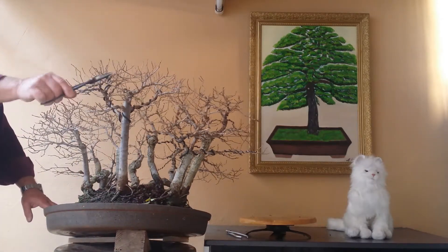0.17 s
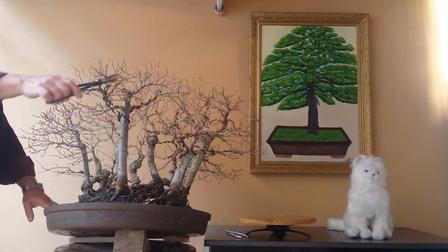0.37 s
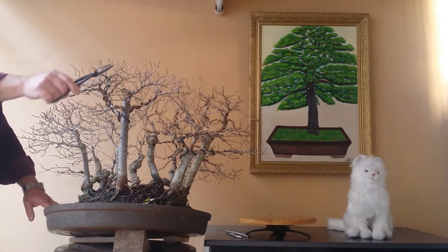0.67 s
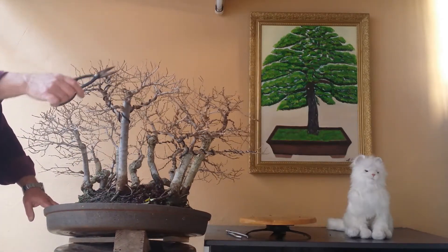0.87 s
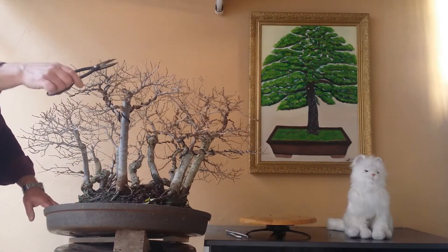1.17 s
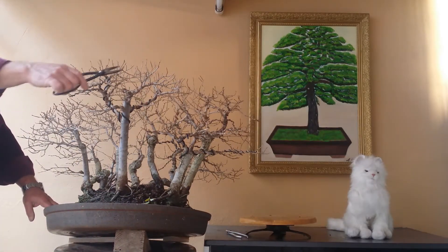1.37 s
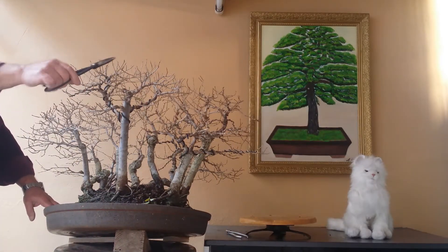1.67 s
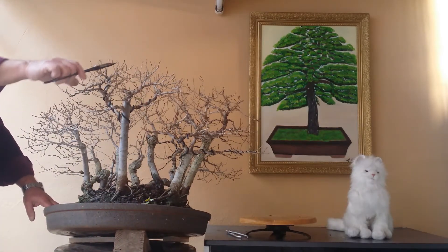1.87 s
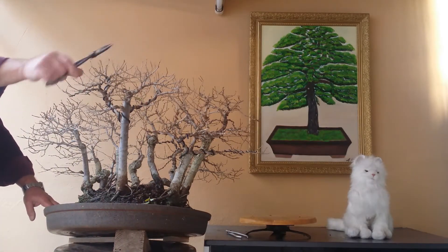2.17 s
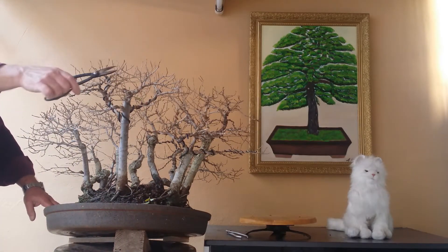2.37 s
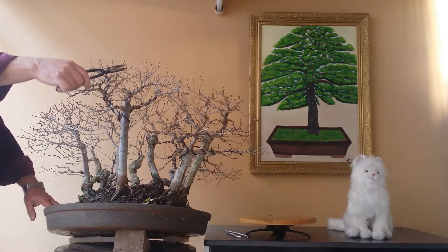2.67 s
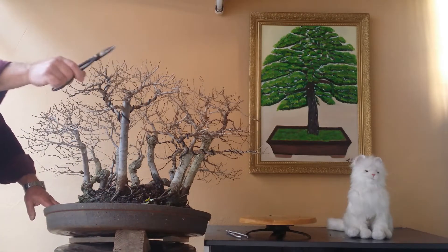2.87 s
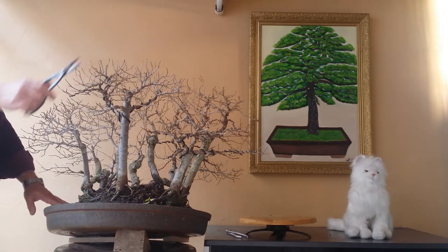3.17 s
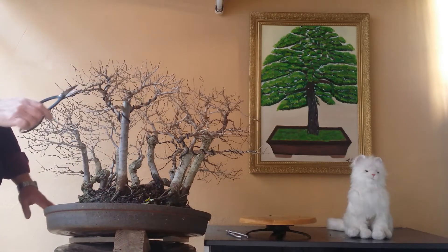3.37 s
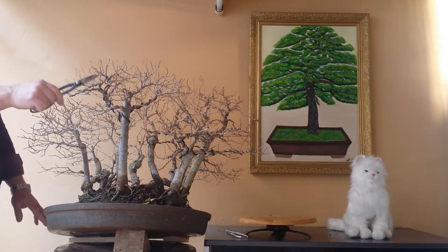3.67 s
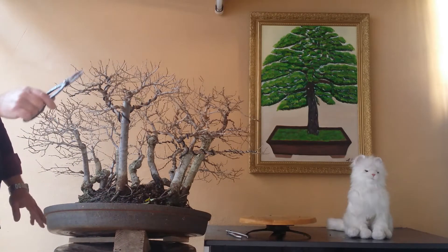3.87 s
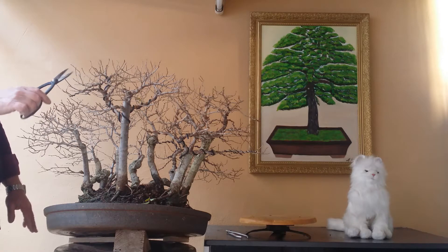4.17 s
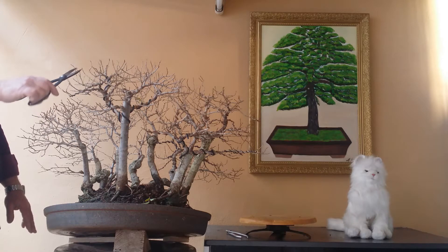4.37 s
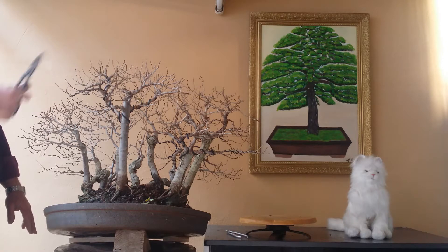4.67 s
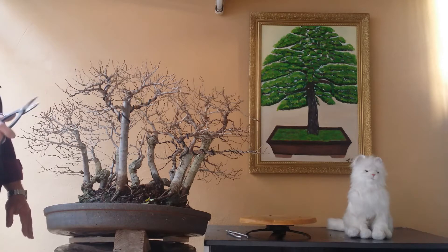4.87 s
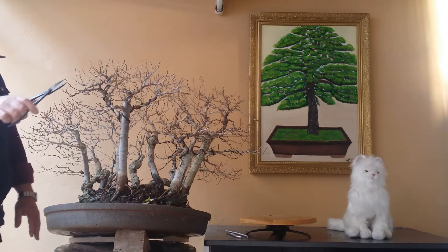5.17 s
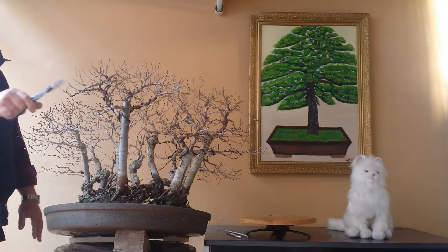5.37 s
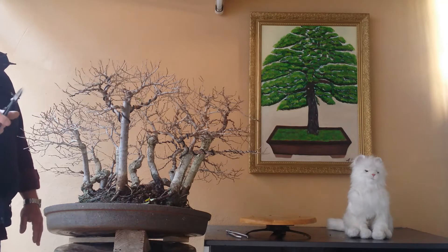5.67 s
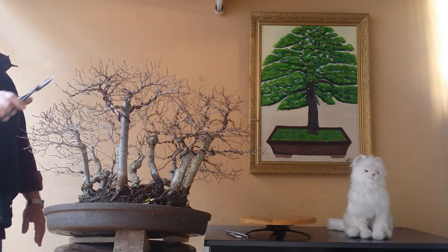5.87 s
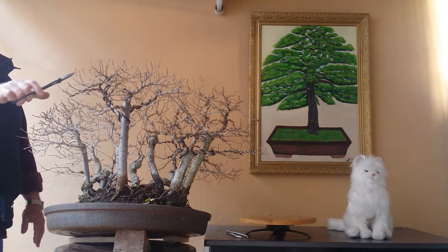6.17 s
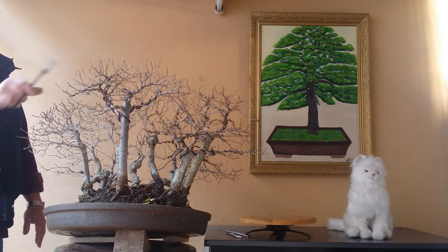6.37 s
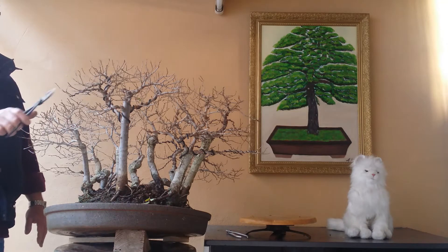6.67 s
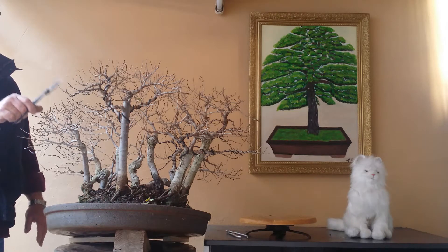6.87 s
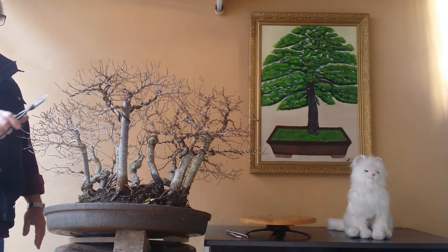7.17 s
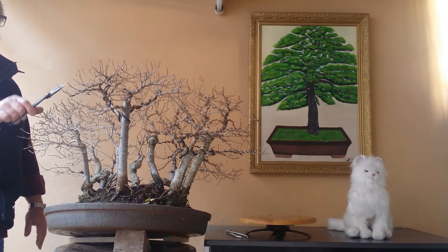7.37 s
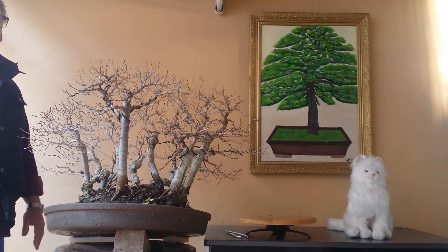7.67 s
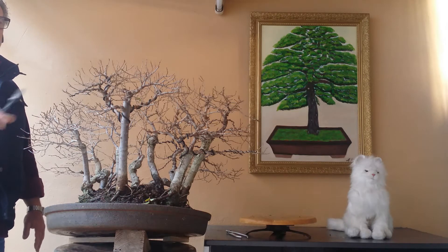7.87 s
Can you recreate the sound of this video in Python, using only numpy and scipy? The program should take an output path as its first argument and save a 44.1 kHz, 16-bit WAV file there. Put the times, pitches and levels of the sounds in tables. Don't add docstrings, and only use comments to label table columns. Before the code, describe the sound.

A close stereo pickup in a small bare room, with soft steady hiss and low traffic rumble through the walls. Slightly left, small steel shears snip dry twigs: very short bright cracks with brief hard reflections and a trembling rustle. Cuts come at about 0.03, 0.5, 1.0 (barely audible), 1.5, 2.0, 2.7, 3.7, 4.5, 5.3, 6.3, 6.8, 7.4 and 7.9 seconds; those at 0.5, 2.0, 2.7, 5.3 and 7.4 are strongest. Faint blade touches precede some, and a tiny cutting taps the table near 5.0. Outside, an engine's low hum climbs until about 2.8, then drops off after 3.15, with a dull wheel bump. Traffic is quieter around 3.5 to 5, then a heavy vehicle draws near, its deep drone and tyre roar swelling from 6.5 and loudest from 7.1 to the end. Thumps come near 7.2 and 7.85, with a faint high brake whistle around 7.7.

```python
import sys
import numpy as np
from scipy import signal
from scipy.fft import rfft, irfft, next_fast_len
from scipy.io import wavfile
from scipy.ndimage import uniform_filter1d, map_coordinates

SR = 44100
rng = np.random.default_rng(int(sys.argv[2]) if len(sys.argv) > 2 else 0)


def bounce(signal):
    frames = np.transpose(np.atleast_2d(signal))
    limited = np.clip(frames, -1, 1)
    pcm = np.round(limited * 32767).astype(np.int16)
    wavfile.write(sys.argv[1], SR, pcm)


def natural_amplitude(level_db):
    exponent = np.asarray(level_db, float) / 20
    return 10 ** exponent


N = 353990

# frequency in Hz, level in dB per Hz.
HISS_COLOUR = [(710, -41), (1200, -7.5), (1900, -8.5), (3000, -5), (4000, -6), (5500, -24), (6100, 3.5),
               (6900, -2), (7300, -1.5), (7900, 1), (8800, -6.5), (10500, -3.5), (11500, -15),
               (15500, -5.5)]
# frequency in Hz, level in dB per Hz.
SWAY_COLOUR = [(6, -3), (18, -2), (27, 0), (34, -3), (44, -20), (70, -60)]
# frequency in Hz, left-right likeness from -1 to 1.
LIKENESS = [(60, 0.89), (110, 0.9), (200, 0.87), (380, 0.82), (700, 0.29), (1290, -0.3), (2380, 0.089),
            (4400, -0.1), (8120, 0.012), (15000, -0.064)]
# time in seconds, firing rate in Hz, load in dB.
NEAR_ENGINE = [
    (0, 79.56, -58),
    (.5, 85.9, -59.5),
    (1.25, 90.56, -56.5),
    (1.42, 92.2, -51.5),
    (1.62, 95.2, -49.5),
    (1.78, 96, -62),
    (2.08, 96.1, -52),
    (2.8, 98.35, -51),
    (3.15, 96.5, -50.5),
]
# centre in seconds, rate in Hz, half length in seconds, level in dB.
IDLE_THROBS = [
    (0.19, 56.3, .15, -72),
    (0.846, 62, 0.25, -68),
    (1.251, 54, 0.12, -69),
    (2.2, 54.7, 0.12, -58.5),
    (2.64, 53.6, 0.081, -57),
    (3.05, 53.7, 0.11, -56),
    (3.282, 51.56, 0.075, -65),
    (3.75, 55.9, 0.067, -59.5),
]
# time in seconds, firing rate in Hz, level in dB.
HEAVY_ENGINE = [
    (3.4, 56, -75),
    (4.1, 56.26, -67),
    (5.0, 56.57, -73.5),
    (5.35, 57.05, -62),
    (6.9, 55.17, -57.5),
    (7.05, 54.7, -47),
    (7.4, 54.64, -46),
    (7.6, 53.4, -50),
    (8.03, 49.8, -50.5),
]
# multiple of the firing rate, level in dB, extra growth in dB per dB of level.
HEAVY_PARTIALS = [(1, 0, -0.19), (2, -4.5, -0.14), (2.42, -7, 0.27), (1.8, -14, 0.49)]
# centre in Hz, width in Hz, lift in dB.
ROOM_MODES = [(96.4, 7.8, 14.5), (176.4, 6.7, 16), (163, 4, 8)]
# time in seconds, nearness in dB.
NEARNESS = [(0, -67.5), (1.45, -66), (1.54, -63), (1.92, -67), (2.12, -62.5), (2.5, -64.5), (3.04, -64),
            (3.46, -70), (4.11, -69.5), (5.3, -65.5), (5.5, -63.5), (5.9, -62), (6.5, -58.5), (6.84, -56),
            (7.07, -48.5), (7.3, -46), (7.5, -45.5), (8.03, -45.5)]
# frequency in Hz, level in dB per Hz.
BOOM_COLOUR = [(12, 5.5), (28, -28), (40, -26), (54, 7), (75, -1.5), (98, 1), (115, -2.5), (135, 0.5),
               (157, -5.5), (178, -2), (210, -8), (250, -6.5), (300, -6.5), (420, -50)]
# frequency in Hz, level in dB per Hz.
RUMBLE_COLOUR = [(120, -9.5), (200, -2), (253, -1), (292, -5.5), (325, -1), (394, -4), (448, -2.5),
                 (502, -4), (579, -5), (839, -6), (995, -9.5), (1100, -10.5), (1430, -19.5), (2420, -120)]
# frequency in Hz, level in dB per Hz.
ROAR_COLOUR = [(470, -25), (800, -11.5), (1200, -8.5), (1800, -11), (2600, -17.5), (3800, -28), (5500, -36),
               (9000, -63)]
# frequency in Hz, level in dB per Hz.
RUSTLE_COLOUR = [(1500, -11.5), (3000, -4.5), (6500, 0), (10000, -5), (15500, -14.5)]
# time in seconds, strength in dB, brightness in dB per octave, twig body in dB,
# room answer in dB.
SNIP_EVENTS = [(0.0333, -23.5, 0, 3.5, -0.5), (0.5144, -15.5, 0.5, 5.5, -1), (1.0254, -46, -2.5, 7, 0.5),
               (1.487, -25, -1, 0.5, 0.5), (2.0125, -12.5, 0, -0.5, -1.5), (2.718, -15, -1, -1, 1),
               (3.6687, -26, 1, 6.5, 0), (4.4804, -27.5, -1.5, -2, -0.5), (5.3339, -12, 0.5, 5, -1),
               (6.2552, -24.5, 0, 5.5, 1.5), (6.8434, -27, -4, -0.5, 0), (7.4037, -12.5, 0.5, 0, 1),
               (7.867, -30, -4, -15, 2.5)]
# three ringing modes in Hz, one damped mode in Hz.
GRIP_MODES = [(5100, 6950, 20000, 3300), (5960, 5720, 7300, 1900), (4170, 4100, 9200, 12800),
              (4800, 11200, 13600, 3200), (3283, 6550, 8450, 8700), (6750, 11630, 14900, 7400),
              (3720, 8100, 11900, 4400), (2150, 7550, 24000, 15000), (2120, 11000, 14000, 1970),
              (7330, 11250, 12900, 9500), (6370, 8200, 12000, 3300), (4600, 12000, 16100, 8500),
              (5370, 5800, 11100, 9100)]
# time in seconds, strength in dB, brightness in dB per octave,
# twig body in dB, room answer in dB.
BRUSH_EVENTS = [
    (2.003, -42, -6, 2, 3),
    (2.637, -55, -1, 0, 1),
    (2.703, -46, -2, -7, -1),
    (5.304, -45, -6.5, 0, 7),
    (5.312, -55, 0, 6, 2),
    (5.792, -57, -1, -1, 1),
]
# three ringing modes in Hz, one damped mode in Hz.
OPEN_BLADES = (5370, 6330, 13000, 9000)
# time in seconds, strength in dB, brightness in dB per octave,
# twig body in dB, room answer in dB.
BOUNCES = [
    (5.015, -58, -8, 6, 8),
    (5.027, -51, -8.5, 6, 6.5),
    (5.035, -51, -17, 8, 0),
]
# three ringing modes in Hz, one damped mode in Hz.
TABLE_MODES = (600, 820, 1650, 2150)
# frequency in Hz, level in dB per Hz.
CRACK_COLOUR = [(400, -35), (1000, -25.5), (1600, -15), (2100, -10), (2450, -12.5), (2900, -9),
                (4600, -3.5), (5600, -4), (6700, 1), (7600, 1), (8800, -2), (11500, -1.5), (15200, 4.5),
                (16900, -29)]
# frequency in Hz, time to fall 60 dB in seconds.
ROOM_DECAY = [(1000, 0.26), (2600, 0.31), (7000, 0.25), (12000, 0.23), (16000, 0.15)]
# delay in seconds, level in dB, left-right tilt in dB.
FIRST_ECHOES = [(.0018, -19, 7), (.0031, -15.5, -23), (.0037, -39, 15), (.0055, -27, 3), (.008, -20, -29),
                (.010, -23, -6), (0.014, -11.5, 11)]
# time in seconds, half length in seconds, level in
# dB.
THUMPS = [
    (3.126, 0.075, -51.5),
    (3.772, 0.064, -54),
    (4.757, 0.031, -62.5),
    (6, 0.068, -61),
    (4.53, 0.038, -59.5),
    (1.5, 0.082, -60),
    (0.62, .02, -67),
    (7.2, 0.23, -53.5),
    (7.85, 0.071, -46.5),
]
# frequency in Hz, level in dB per Hz.
THUD_COLOUR = [(40, -11), (90, 1), (200, -6.5), (330, -18), (600, -17), (1400, -22.5), (3000, -31.5),
               (8000, -30), (15000, -57)]
# start in seconds, end in seconds, first pitch in Hz, last pitch in Hz, level in dB.
BRAKE_SQUEALS = [
    (7.63, 7.83, 4880, 5150, -64),
    (7.64, 7.76, 4320, 4330, -69),
]

TOP_HZ = 15650
LEAD = 7.36
MIDDLE_DB = -60


def unit(x):
    return x / np.sqrt(np.mean(x ** 2) + 1e-20)


def along(points, hz):
    f, v = np.transpose(points)
    return np.interp(np.log(hz + 1), np.log(f + 1), v)


def curves(rows):
    s, *columns = np.transpose(rows)
    return [np.interp(np.arange(N) / SR, s, column) for column in columns]


def wobble(rate):
    knots = rng.standard_normal(int(N * 40 / SR) + 4)
    return map_coordinates(knots, [np.arange(N) * min(rate, 39) / SR])


def swell(s, half):
    t = np.arange(N) / SR
    return np.exp(-.5 * ((t - s) / half) ** 2)


def causal(db):
    cep = irfft(np.log(natural_amplitude(db) + 1e-6))
    half = len(cep) // 2
    cep[1:half] *= 2
    cep[half + 1:] = 0
    return np.exp(rfft(cep))


def rush(spectrum, patchy_db):
    z = signal.stft(rng.standard_normal((2, N)), nperseg=512)[2]
    field = uniform_filter1d(rng.standard_normal(z.shape[1:]), size=6, axis=0)
    field = uniform_filter1d(field, size=14, axis=1)
    pair = signal.istft(z * natural_amplitude(patchy_db * unit(field)), nperseg=512)[1][:, :N]
    m = next_fast_len(N + 8192)
    hz = np.fft.rfftfreq(m, 1 / SR)
    turn = np.arccos(np.clip(along(LIKENESS, hz), -1, 1)) / 2
    colour = natural_amplitude(along(spectrum, hz)) * (hz < TOP_HZ)
    mid, side = irfft(rfft(pair, m) * colour * [np.cos(turn), np.sin(turn)], m)[:, :N]
    return unit(np.array([mid + side, mid - side]))


def microphone_hiss():
    return natural_amplitude(-70.5) * rush(HISS_COLOUR, patchy_db=0.6)


def building_sway():
    return natural_amplitude(-71.5) * rush(SWAY_COLOUR, patchy_db=0.7)


def throttle():
    hz, load_db = curves(NEAR_ENGINE)
    coasting = np.clip(np.arange(N) / SR - NEAR_ENGINE[-1][0], 0, 2)
    return hz - 31.5 * np.minimum(coasting, 1), load_db - 58 * coasting


def room_lift(hz):
    return sum(db / (1 + ((hz - c) / w) ** 2) for c, w, db in ROOM_MODES) - ROOM_MODES[0][2]


def near_engine():
    hz, load_db = throttle()
    phase = 2 * np.pi * np.cumsum(hz * (1 + 0.0046 * wobble(9.5))) / SR
    first = natural_amplitude(load_db + room_lift(hz) + 0.42 * wobble(7.54)) * np.sin(phase)
    second = natural_amplitude(load_db - 6 + room_lift(2 * hz) + 1.7 * wobble(7.0)) * np.sin(2 * phase)
    return first + second


def idling_engine():
    t = np.arange(N) / SR
    return sum(natural_amplitude(db) * swell(s, half) * np.sin(2 * np.pi * hz * t) for s, hz, half, db in IDLE_THROBS)


def heavy_engine():
    hz, db = curves(HEAVY_ENGINE)
    out = np.zeros(N)
    for multiple, order_db, grows in HEAVY_PARTIALS:
        turns = np.cumsum(multiple * hz * (1 + 0.013 * wobble(12))) / SR
        level_db = db + order_db + grows * (db - MIDDLE_DB)
        unsteady_db = (.5 + 1.16 * multiple) * wobble(9)
        out += natural_amplitude(level_db + unsteady_db) * np.sin(2 * np.pi * turns)
    return out * (np.arange(N) / SR > 3.4)


def engines():
    return np.sqrt(2) * (near_engine() + idling_engine() + heavy_engine()) * natural_amplitude([[-.3], [.3]])


def shaking():
    events = np.array(SNIP_EVENTS)
    since = np.clip(np.arange(N) / SR - events[:, :1], 0, None)
    rise_s, fall_s = 0.037, 0.12
    return natural_amplitude(events[:, 1] / 2) @ ((1 - np.exp(-since / rise_s)) * np.exp(-since / fall_s))


def road():
    near_db, = curves(NEARNESS)

    def law(level_db, growth):
        return natural_amplitude(level_db + growth * (near_db - MIDDLE_DB))

    surge = wobble(6.5)
    tremble = natural_amplitude(-49) * shaking()
    rocking_pot = natural_amplitude(1.5) * tremble
    intake = natural_amplitude(throttle()[1] - 23)
    boom = law(-58.5, 0.8) * natural_amplitude(0.43 * surge) * rush(BOOM_COLOUR, patchy_db=2.5)
    rumble_level = np.hypot(law(-57.5, 1.01) * natural_amplitude(0.5 * surge), rocking_pot)
    rumble = rumble_level * rush(RUMBLE_COLOUR, patchy_db=1.0)
    roar = law(-64, 0.9) * natural_amplitude(1.8 * surge) * rush(ROAR_COLOUR, patchy_db=1.3)
    rustle_level = np.hypot(law(-66.5, 0.59) + intake, tremble)
    rustle = rustle_level * rush(RUSTLE_COLOUR, patchy_db=2.5)
    return (boom + rumble + roar) * natural_amplitude([[-.9], [.9]]) + rustle


def room():
    hz, t, z = signal.stft(rng.standard_normal((2, SR // 2)), SR, nperseg=256)
    decay = natural_amplitude(-60 * t / along(ROOM_DECAY, hz)[:, None])
    tail = signal.istft(z * decay, SR, nperseg=256)[1][:, :SR // 2]
    t = np.arange(tail.shape[1]) / SR
    sparse = natural_amplitude(4.1 * np.exp(-t / .02) * rng.standard_normal(tail.shape))
    tail = tail * sparse * (1 - np.exp(-(t / 0.0032) ** 2))
    answer = natural_amplitude(7.5) * tail / np.linalg.norm(tail, axis=1, keepdims=True)
    for s, db, pan_db in FIRST_ECHOES:
        at = np.round((s + rng.normal(0, 0.00022)) * SR + np.array([0, LEAD])).astype(int)
        answer[[0, 1], at] += natural_amplitude(db + np.array([.5, -.5]) * pan_db) * rng.choice([-1, 1])
    return answer


def cuts(events, grips):
    out, m = np.zeros((2, N + SR)), 32768
    hz = np.fft.rfftfreq(m, 1 / SR)
    t = np.arange(-132, 132) / SR
    arrival = natural_amplitude([[1.3], [-1.3]]) * np.exp(-2j * np.pi * hz * np.array([[0], [LEAD]]) / SR)
    crack = np.exp(2j * np.pi * hz * t[0])
    air = 1 / (1 + (hz / 15620) ** 110)
    creak = natural_amplitude(-35) * np.exp(t / .0011) * (t < 0)
    chatter = natural_amplitude(-11.5) * np.exp(-t / .001) * (t > 0)
    for (s, db, tilt_db, body_db, wet_db), grip in zip(events, grips):
        near = crack + rfft(rng.standard_normal(len(t)) * (creak + chatter), m)
        near = natural_amplitude(2.1) * near / np.sqrt(np.mean(np.abs(near) ** 2))
        peaks = 1 / (1 + ((hz - np.array(grip)[:, None]) / 230) ** 2)
        modes = np.array([6, 6, 6, -7]) @ peaks
        ripple = 2.1 * map_coordinates(rng.standard_normal(110), [hz / 220])
        body = body_db / (1 + (hz / 3000) ** 4)
        tilt = tilt_db * np.log2((hz + 1) / 6000)
        colour = causal(along(CRACK_COLOUR, hz) + tilt + body + modes + ripple)
        colour = rng.choice([-1, 1]) * colour / np.linalg.norm(irfft(colour, m))
        reverb = natural_amplitude(wet_db) * crack * rfft(room(), m) * air
        heard = irfft(colour * (near * arrival + reverb), m)
        out[:, round((s + t[0]) * SR):][:, :m] += natural_amplitude(db + 11.5) * heard
    return out[:, :N]


def shears():
    snips = cuts(SNIP_EVENTS, GRIP_MODES)
    brushes = cuts(BRUSH_EVENTS, [OPEN_BLADES] * len(BRUSH_EVENTS))
    landing = cuts(BOUNCES, [TABLE_MODES] * len(BOUNCES))
    return snips + brushes + landing


def thumps():
    return sum(natural_amplitude(db) * swell(s, half) for s, half, db in THUMPS) * rush(THUD_COLOUR, patchy_db=-3.0)


def brakes():
    t, out = np.arange(N) / SR, np.zeros(N)
    for start, end, from_hz, to_hz, db in BRAKE_SQUEALS:
        u = np.clip((t - start) / (end - start), 0, 1)
        hz = from_hz + (to_hz - from_hz) * u + 15 * wobble(38)
        level = natural_amplitude(db + 2.6 * wobble(26)) * np.sqrt(np.abs(np.sin(np.pi * u))) * (u < 1)
        out += level * np.sin(2 * np.pi * np.cumsum(hz) / SR)
    return out


def scene():
    return engines() + road() + shears() + thumps() + brakes()


def roll_off(x):
    return signal.sosfilt(signal.butter(12, 16820, fs=SR, output="sos"), x)


def record(dry):
    mix = dry + microphone_hiss() + building_sway()
    return roll_off(mix)


dry = scene()
out = record(dry)
bounce(out)
```